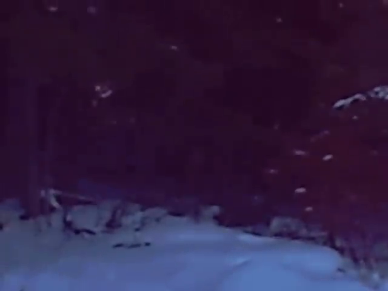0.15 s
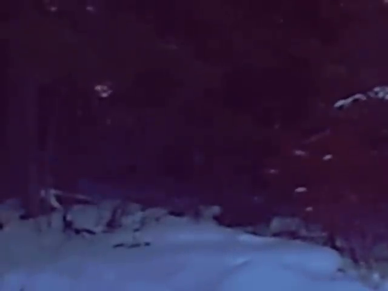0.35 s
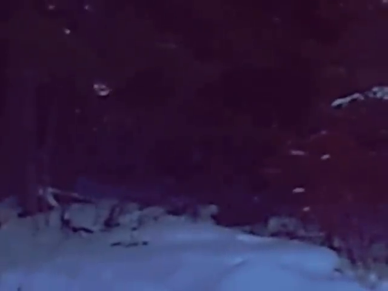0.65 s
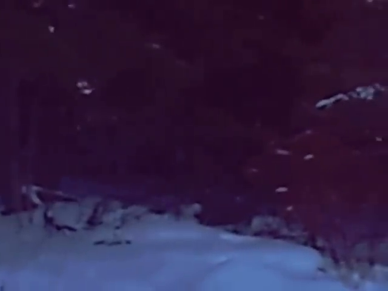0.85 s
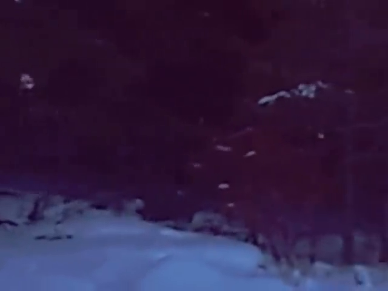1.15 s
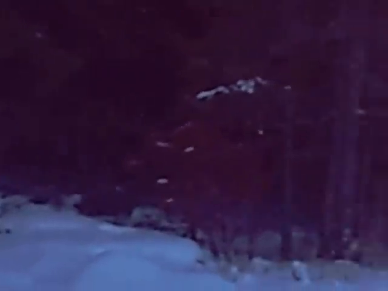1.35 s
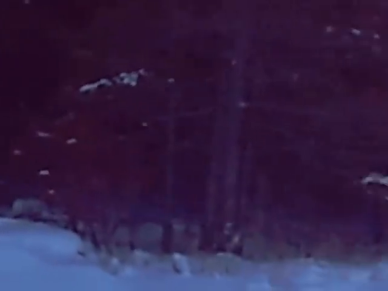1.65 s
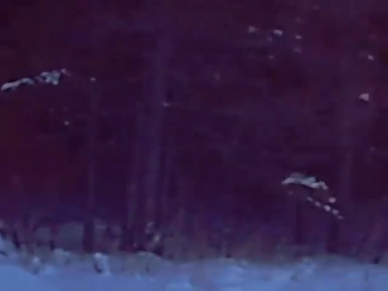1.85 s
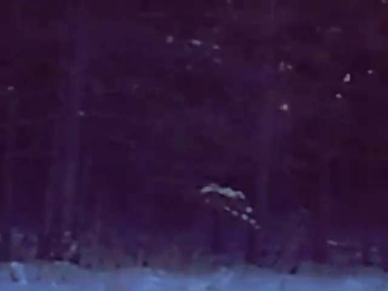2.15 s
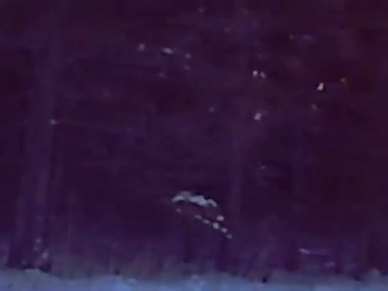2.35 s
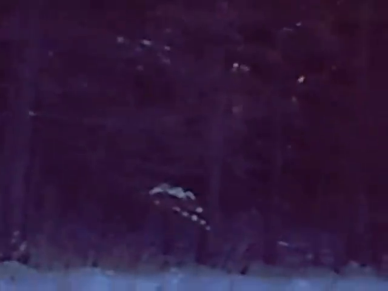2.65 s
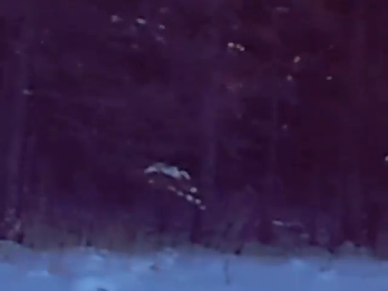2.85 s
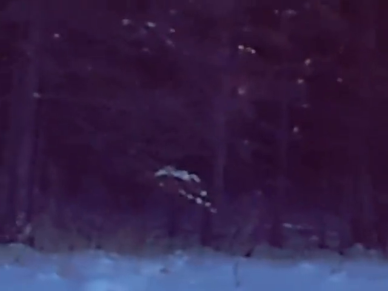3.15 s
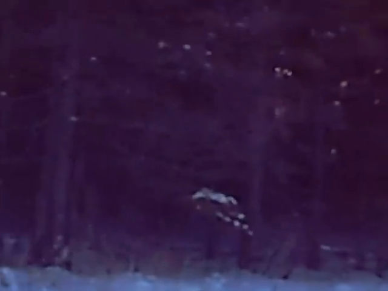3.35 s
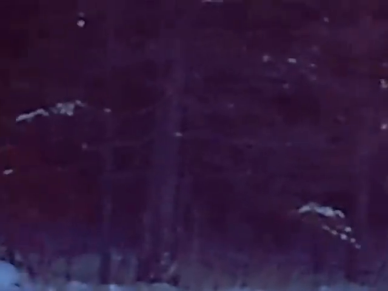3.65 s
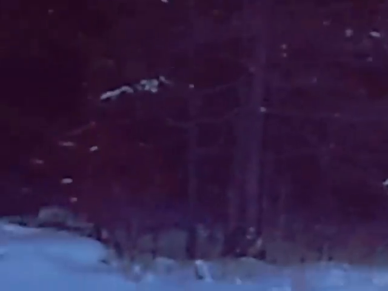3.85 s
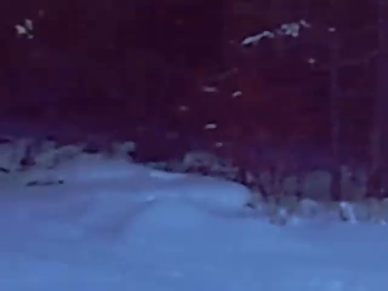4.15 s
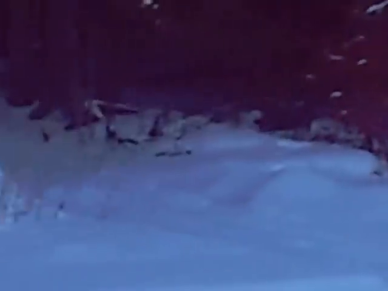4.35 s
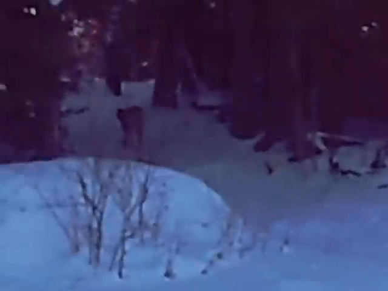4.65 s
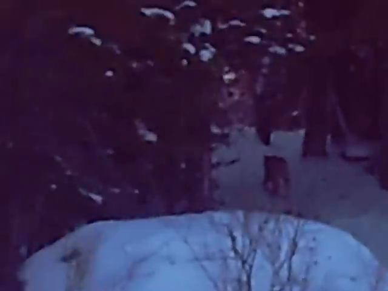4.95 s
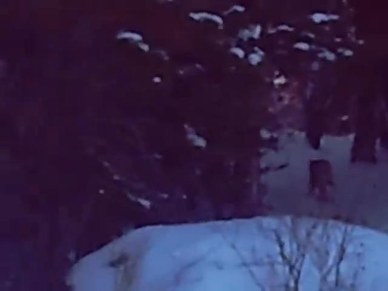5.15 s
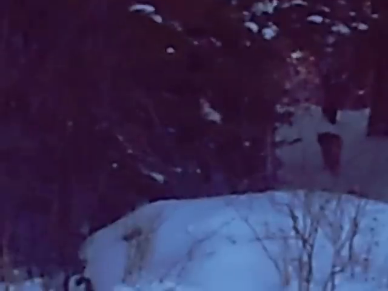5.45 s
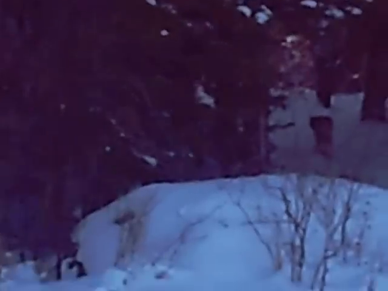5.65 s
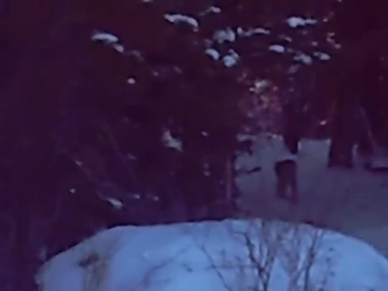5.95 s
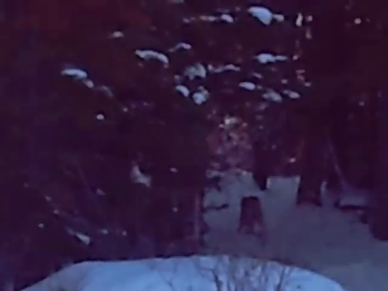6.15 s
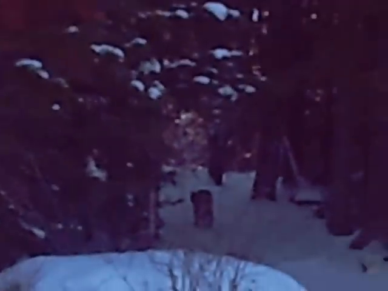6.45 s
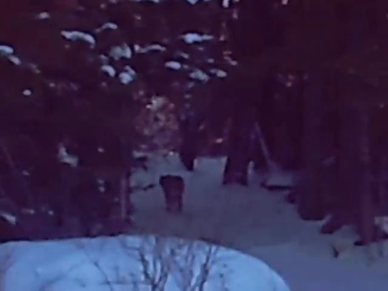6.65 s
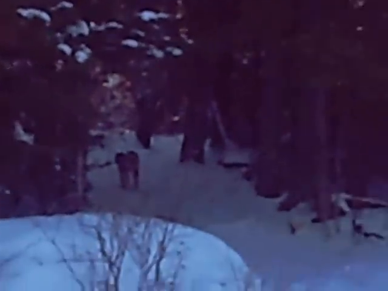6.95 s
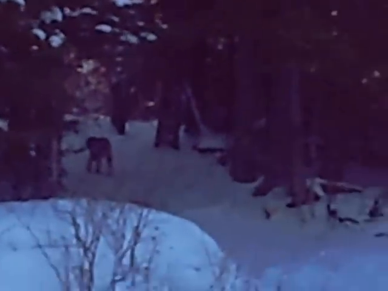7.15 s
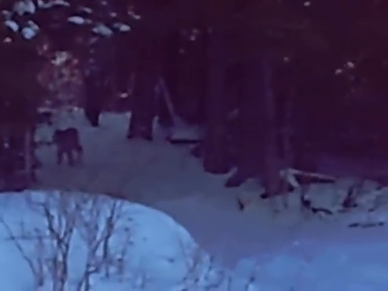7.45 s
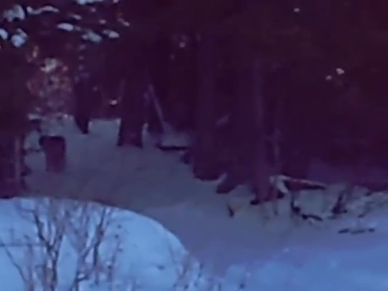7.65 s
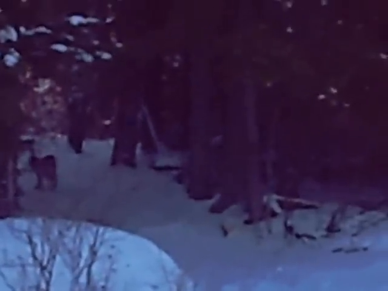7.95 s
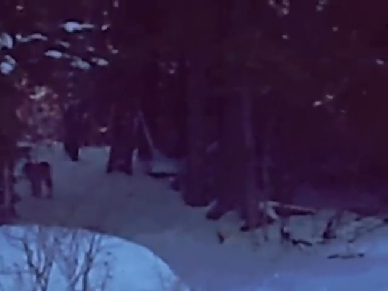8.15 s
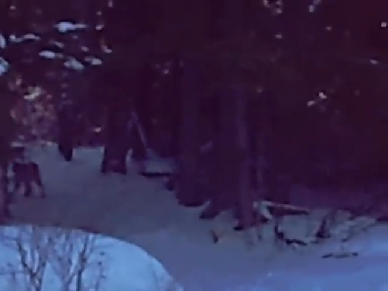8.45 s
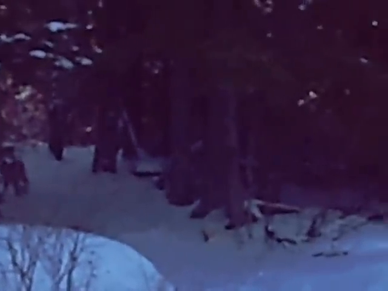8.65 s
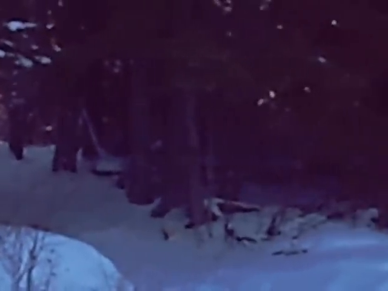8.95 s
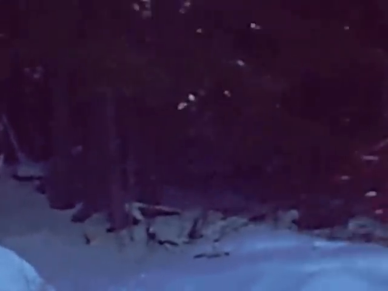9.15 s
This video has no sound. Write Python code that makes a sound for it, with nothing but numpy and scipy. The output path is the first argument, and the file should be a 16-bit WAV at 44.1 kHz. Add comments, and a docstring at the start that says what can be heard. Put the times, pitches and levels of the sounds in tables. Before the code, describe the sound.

A snowmobile idles close by with a deep, slightly uneven throb and faint rattling, while light wind bumps the microphone.

```python
"""In a snowy forest, a two-cylinder two-stroke snowmobile idles close to a hand-held microphone.
Each firing sends a puff down the exhaust, whose throb weakens every three or four firings as the
engine runs short of fuel. Pistons tick, the clutch clacks, panels and loose parts rattle and a fan
whines thinly. Around four seconds in, the microphone swings to another side of the machine
(the "turn"), which shifts the balance of the parts. Light wind rumbles and bumps on the microphone."""
import sys
import numpy as np
from scipy import signal
from scipy.fft import rfft, irfft, next_fast_len
from scipy.io import wavfile
from scipy.ndimage import uniform_filter1d, map_coordinates

SR = 44100
rng = np.random.default_rng(int(sys.argv[2]) if len(sys.argv) > 2 else 0)


def int16_out(signal):
    """Quantize to a 16-bit WAV file."""
    q = np.round(np.clip(np.atleast_2d(signal).T, -1, 1) * 32767)
    wavfile.write(sys.argv[1], SR, q.astype(np.int16))


N = 411005

IDLE_HZ = 58.15  # firings per second
# exhaust and chassis sink a little after the swing, then come back: t/s, gain/dB
NEARNESS = [(0, -1), (3.6, -1), (4.6, -1), (5.8, -2.5), (7.8, 0.5), (9.32, 1)]
# tone of rattling metal: f/Hz, gain before the turn/dB, gain after it/dB
RATTLE_TONE = [(990, -24, -13.5), (2140, -7, -3), (3530, -4, -0.5), (4760, -3.5, 0), (5230, -3, -5),
               (5970, -3, -4), (7070, -7, -5), (8200, -16, -15.5), (9800, -17.5, -14.5),
               (10500, -38, -37.5)]


def amp(db):
    """Turn decibels into a gain."""
    return 10 ** (np.asarray(db) / 20)


def unit(x):
    """Scale x to an average (rms) level of 1."""
    return x / np.sqrt(np.mean(x ** 2) + 1e-20)


def curve(points):
    """Join (time, value) points with straight lines, one value per sample."""
    return np.interp(np.arange(N) / SR, *np.transpose(points))


def wobble(rate):
    """A smooth curve through `rate` random values a second."""
    values = rng.standard_normal(int(N * rate / SR) + 4)
    return map_coordinates(values, [np.arange(N) * rate / SR])


def filtered(x, response):
    """Multiply each frequency in x by response(frequency)."""
    size = 2 * next_fast_len(N // 2 + SR // 4)
    return irfft(rfft(x, size) * response(np.fft.rfftfreq(size, 1 / SR)), size)[:N]


def coloured(x, points):
    """Shape the tone of x along (frequency, gain) points."""
    def response(hz):
        f, db = np.transpose(points)
        gain = amp(np.interp(np.log(hz + 1), np.log(f), db))
        cepstrum = irfft(np.log(gain))
        # folding this in half makes the filter ring after a hit, never before it
        cepstrum[1:len(hz) - 1] *= 2
        cepstrum[len(hz):] = 0
        return np.exp(rfft(cepstrum))
    return filtered(x, response)


def ringing(x, modes):
    """Let x ring at each (frequency, width, gain), with every second ring flipped in sign."""
    return filtered(x, lambda f: sum((-1) ** k * amp(db) * 1j * f * w / (c * c - f * f + 1j * f * w)
                                     for k, (c, w, db) in enumerate(modes)))


def strikes(phase, size, scatter_db):
    """One click, its size scattered at random, each time the phase passes a whole number."""
    at = np.flatnonzero(np.diff(np.floor(np.maximum.accumulate(phase))))
    train = np.zeros(N)
    train[at] = size[at] * amp(scatter_db * rng.standard_normal(N // 100)[:len(at)])
    return train


def dying(train, t60):
    """Give each click a tail that fades by 60 dB in t60 seconds."""
    return signal.lfilter([1], [1, -amp(-60 / (t60 * SR))], train)


def sooner(x, seconds):
    """Move x earlier in time."""
    return np.roll(x, -int(seconds * SR))


def turn_gain(levels_db, turn):
    """A gain that slides from the first level to the second during the turn."""
    before, after = levels_db
    return amp(before + (after - before) * turn)


def turn_filter(body, x, table, turn):
    """Filter x through a body, fading from the table's "before" gains to its "after" gains."""
    before = unit(body(x, np.delete(table, -1, axis=1)))
    after = unit(body(x, np.delete(table, -2, axis=1)))
    return unit((1 - turn) * before + turn * after)


def wind(breeze_db=-41, swing_db=1.5):
    """Air flowing over the microphone makes a low rumble that swells with each gust."""
    # gusts: t/s, half length/s, level/dB
    gusts = [(0.703, 0.55, -46), (2.2, 0.38, -33.5), (2.693, 0.14, -33.5), (3.277, 0.07, -30.5),
             (3.648, 0.098, -32), (4.299, 0.17, -32.5), (4.548, 0.16, -38), (5.158, 0.13, -30),
             (5.543, 0.18, -33), (6.294, 0.23, -34)]
    # tone of the rumble: f/Hz, gain/dB
    rumble_tone = [(4, -11), (12, -5), (35, -8), (70, -12.5), (130, -23), (300, -31), (1000, -68),
                   (3000, -100)]
    t = np.arange(N) / SR
    breeze = amp(breeze_db + swing_db * wobble(1.4))
    power = breeze ** 2 + sum(amp(db) ** 2 * np.exp(-((t - s) / half) ** 2) for s, half, db in gusts)
    return np.sqrt(power) * unit(coloured(rng.standard_normal(N), rumble_tone))


def wind_bumps(rise_s=0.0058, t60=0.067):
    """Short pushes of air hit the microphone, blunt or crisp, most with a fluttering tail."""
    # pushes: t/s, thump peak/dB, knock peak/dB, amount of flutter
    pushes = [(2.739, -27.5, -63, 0.11), (3.27, -40, -42, 0.04), (3.3, -25.5, -45, 0.03),
              (3.581, -27, -52, 0), (3.661, -32.5, -44, 0.05), (3.696, -22, -41, 0.03),
              (4.542, -27.5, -32, 0), (5.091, -27.5, -43, 0.1), (5.145, -27.5, -42, 0.02),
              (5.194, -39, -35.5, 0.05), (5.219, -32, -47, 0.08), (5.465, -21.5, -38, 0.03),
              (6.24, -27.5, -51, 0), (6.317, -27, -47, 0.1), (6.348, -26.5, -48, 0.03)]
    # tone of the blunt thump: f/Hz, gain/dB
    thump_tone = [(15, -24.5), (50, 6), (140, 0), (300, -8), (600, -27), (1500, -54), (4000, -59.5)]
    # tone of the crisp knock: f/Hz, gain/dB
    knock_tone = [(60, -7.5), (250, 8.5), (550, 4), (850, -14), (1300, -13.5), (4000, -48)]
    t = np.arange(SR // 8) / SR
    tail = (1 - np.exp(-t / rise_s)) * amp(-60 * t / t60)
    thumps, knocks = np.zeros((2, N + SR))
    for s, thump_db, knock_db, flutter in pushes:
        push = (t == 0) + flutter * tail * rng.standard_normal(len(t))
        thumps[round(s * SR):][:len(t)] += amp(thump_db) * push
        knocks[round(s * SR):][:len(t)] += amp(knock_db) * push
    return sum(coloured(x[:N], tone) / coloured([1], tone).max()
               for x, tone in [(thumps, thump_tone), (knocks, knock_tone)])


def fan(crank, burn, multiple=30):
    """The cooling fan whines at a multiple of the firing rate and flutters with the uneven shaft."""
    # loudness of the whine: t/s, level/dB
    whine_level = [(1.8, -75), (2.35, -66), (4, -72.5), (4.65, -66.5), (5.4, -71), (7.2, -69.5),
                   (7.7, -64.5), (8.7, -67), (9.32, -69)]
    flutter = sooner(burn, 0.005) ** 1.4 * amp(1.9 * wobble(18)) * (1 + 0.34 * wobble(80))
    slip = 0.15 * wobble(55)
    whine = np.sin(2 * np.pi * (multiple * crank + slip))
    return amp(curve(whine_level)) * unit(flutter * whine)


def loose_metal(burn, t60=0.1, rise_s=0.004):
    """A loose metal part chirps on the hardest firings and now and then clinks louder."""
    # loudness of the chirps: t/s, level/dB
    chirp_level = [(3.8, -77), (4.5, -79.5), (7.2, -75.5), (9.32, -70.5)]
    # single clinks: t/s, level/dB
    clink_hits = [(4.484, -61), (6.582, -60), (7.95, -60), (8.125, -60), (8.595, -59.5), (8.91, -60),
                  (8.98, -59.5), (9.115, -61)]
    # how the part rings: f/Hz, width/Hz, gain/dB
    metal_rings = [(4420, 94, -8.5), (4600, 97, -3)]
    t = np.arange(SR // 4) / SR
    clinks = np.zeros(N + SR)
    for s, db in clink_hits:
        clinks[round(s * SR):][:len(t)] += amp(db - 60 * t / t60) * (1 - np.exp(-t / rise_s))
    rubbing = unit(sooner(burn, 0.003) ** 2.3 * amp(2.2 * wobble(22)))
    ring = unit(ringing(rng.standard_normal(N), metal_rings))
    return (amp(curve(chirp_level)) * rubbing + clinks[:N]) * ring


def clutch(crank, burn, turn):
    """Three clutch weights each give one short, dry clack per revolution, a few much harder."""
    # loudness of the clacks: t/s, level/dB
    clack_level = [(0, -69), (1.3, -70.5), (1.85, -65.5), (2.6, -69.5), (5.3, -77.5), (9.32, -76)]
    blows = strikes(crank * 3 / 2 - 0.17 + 0.04 * wobble(90), burn ** 1.2, scatter_db=4)
    clacks = dying(blows, t60=0.007) * rng.standard_normal(N)
    return amp(curve(clack_level)) * turn_filter(coloured, clacks, RATTLE_TONE, turn)


def rattle(burn, turn):
    """Loose parts chatter, louder when the engine fires harder."""
    # loudness of the chatter: t/s, level/dB
    rattle_level = [(0, -62), (1.2, -62.5), (1.9, -61), (3, -62.5), (5.3, -63), (6.6, -62), (9.32, -59.5)]
    flicker = amp(2.26 * wobble(480) + 0.23 * wobble(25))
    chatter = unit((0.33 + sooner(burn, 0.0019)) * flicker) * rng.standard_normal(N)
    return amp(curve(rattle_level)) * turn_filter(coloured, chatter, RATTLE_TONE, turn)


def hood_and_cylinder(jolts, roughness=0.4):
    """The jolted hood drones at three pitches; a faint, high cylinder ring swells near two seconds."""
    # three hood rings, then the cylinder ring: f/Hz, width/Hz, gain added to its level below/dB
    rings = [(527, 14, -3.5), (680, 17, 0.5), (1060, 38, -5.5), (2290, 350, -3.5)]
    # loudness of each ring as the microphone moves: t/s, level/dB
    hood_low = [(0, -59), (1.4, -66), (2.1, -56.5), (3.4, -60.5), (4.6, -63.5), (7, -66), (9.32, -65.5)]
    hood_mid = [(0, -58.5), (2.05, -58), (2.5, -63), (3.4, -57.5), (4.6, -67.5), (8, -67), (9.32, -60.5)]
    hood_high = [(0, -59), (1.2, -61), (1.9, -55.5), (2.8, -68.5), (5.4, -79), (7.5, -64.5), (9.32, -63)]
    cylinder = [(1.2, -73), (1.8, -70.5), (2.2, -66.5), (2.8, -74)]
    shake = jolts + roughness * rng.standard_normal(N)
    return sum(amp(curve(level) + db) * unit(ringing(shake, [(hz, width, 0)]))
               for (hz, width, db), level in zip(rings, [hood_low, hood_mid, hood_high, cylinder]))


def chassis(crank, burn, turn, levels_db=(-53.5, -55.5), ring_db=-7, noise_db=-0.45):
    """Each firing shakes the panels, hood and cylinder; the frame knocks once per revolution."""
    # how the weaker panels ring: f/Hz, width/Hz, gain before the turn/dB, gain after it/dB
    panel_rings = [(581, 33, 5.5, 5.5), (818.4, 26, 5.5, 9.5), (1233, 17, -18.5, 1.5)]
    # tone of the frame's noise: f/Hz, gain before the turn/dB, gain after it/dB
    frame_tone = [(243, -10.5, -19.5), (506, 4.5, 0.5), (640, -3.5, -5.5), (750, -7.5, -10.5),
                  (940, -0.5, -4), (1330, -6, -5.5), (1528, -4.5, -6), (2050, -15.5, -17.5),
                  (2700, -14.5, -12.5), (6200, -47.5, -44)]
    bang = sooner(burn, 0.0055)
    jolts = unit(strikes(crank + 0.02 * wobble(60), bang ** 0.5, scatter_db=0.5))
    shake = jolts + 0.81 * bang ** 0.5 * rng.standard_normal(N)
    panels = turn_filter(ringing, shake, panel_rings, turn)
    drone = hood_and_cylinder(jolts)
    knocks = strikes(crank / 2 - 0.78, burn ** 0.71, scatter_db=1.5)
    noise_swell = 0.23 * unit(dying(knocks, t60=0.089)) + bang ** 0.4
    frame = turn_filter(coloured, noise_swell * rng.standard_normal(N), frame_tone, turn)
    gain = amp(curve(NEARNESS)) * turn_gain(levels_db, turn)
    return drone + gain * (amp(ring_db) * panels + amp(noise_db) * frame)


def pistons(crank, burn, turn, scraping=0.3, scrape_delay_s=0.002):
    """The two pistons slap their cylinder walls one after the other, once per revolution each."""
    # loudness of the ticks, which are easily blocked from view: t/s, level/dB
    tick_level = [(0, -58.5), (1.35, -60), (1.8, -56), (3.25, -63.5), (3.85, -58), (4.05, -73.5),
                  (6, -63.5), (7.6, -62), (9.32, -58.5)]
    # the far piston comes into the open after the turn: t/s, level against the near one/dB
    far_level = [(1.2, -8), (1.8, -6.5), (2.6, -10.5), (4.6, -11.5), (6, 0.4)]
    # how the cylinders ring: f/Hz, width/Hz, gain before the turn/dB, gain after it/dB
    cylinder_rings = [(2154, 120, -7.5, -3.5), (2390, 130, -1, -1), (2596, 110, -9.5, -3),
                      (2960, 84, -0.5, 1), (4160, 61, -8, -4.5), (4540, 88, -13, -8)]
    near = strikes(crank / 2 - 0.725 + 0.0015 * wobble(30), burn ** 0.15, scatter_db=1)
    far_size = amp(curve(far_level)) * burn ** 0.18
    far = strikes(crank / 2 - 0.19 + 0.0018 * wobble(30), far_size, scatter_db=0.7)
    slaps = near + far
    # the piston's side lands hard, then scrapes on
    scrape = dying(np.roll(slaps, int(scrape_delay_s * SR)), t60=0.012) * rng.standard_normal(N)
    contact = unit(slaps) + scraping * unit(scrape)
    return amp(curve(tick_level)) * turn_filter(ringing, contact, cylinder_rings, turn)


def combustion(swing=0.36, swing_firings=3.4, spread_s=0.004, gap_s=0.011, rebound_s=0.033):
    """How hard the fuel burns: it swings between rich and lean, and each misfire leaves a hole."""
    # lean moments when the engine misfires: t/s, relative depth (0-1)
    misfires = [(0.109, 0.8), (0.299, 0.8), (0.451, 0.6), (0.59, 0.7), (0.641, 1), (0.692, 0.9),
                (0.794, 0.8), (0.846, 1), (1.145, 0.5), (1.219, 0.6), (1.357, 0.9), (1.427, 0.5),
                (1.483, 0.8), (1.685, 0.5), (1.792, 1), (1.968, 0.4), (2.078, 0.5), (2.168, 0.8),
                (2.347, 0.8), (2.499, 0.3), (2.893, 0.7), (3.245, 0.7), (3.843, 0.6), (4.113, 0.7),
                (4.307, 0.8), (4.431, 0.6), (4.533, 0.7), (4.583, 0.6), (4.635, 0.8), (4.683, 0.3),
                (4.732, 0.9), (4.788, 0.8), (4.841, 0.6), (4.959, 0.5), (5.011, 0.8), (5.132, 0.7),
                (5.394, 0.8), (5.588, 0.8), (5.837, 0.6), (5.886, 0.9), (5.948, 0.9), (6.065, 0.6),
                (6.221, 0.5), (6.286, 0.7), (6.341, 0.8), (6.703, 0.6), (6.834, 0.6), (7.087, 0.6),
                (7.227, 1), (7.566, 0.5), (7.806, 0.9), (7.94, 0.5), (8.005, 0.5), (8.176, 0.7),
                (8.225, 0.6), (8.275, 0.4), (8.431, 0.5), (8.479, 0.8), (8.537, 0.6), (8.583, 0.8),
                (8.824, 0.9), (9.094, 0.9), (9.17, 0.5), (9.243, 0.5)]
    at, size = np.transpose(misfires)
    edges = np.r_[0, at, N / SR]
    # a whole number of swings lies between two misfires
    swings = np.maximum(1, np.round(np.diff(edges) * IDLE_HZ / swing_firings))
    uneven_time = np.arange(N) / SR + spread_s * wobble(10)
    cycle = np.interp(uneven_time, edges, np.r_[0, np.cumsum(swings)])
    t = np.arange(-SR // 8, SR // 8 + 1) / SR
    dip = 0.8 * np.exp(-0.5 * (t / gap_s) ** 2)
    rebound = 0.08 * np.exp(-0.5 * ((abs(t) - rebound_s) / gap_s) ** 2)  # harder bangs on both sides
    misses = np.bincount((at * SR).astype(int), size, minlength=N)[:N]
    holes = signal.fftconvolve(misses, rebound - dip, "same")
    unrest = 0.09 * wobble(60)
    burn = np.abs((1 + holes) * (1 - swing * np.cos(2 * np.pi * cycle) + unrest))
    burn = burn / uniform_filter1d(burn, SR // 7)  # the fuel supply is steady over several firings
    return unit(burn / (1 + (burn / 2.13) ** 4) ** (1 / 4))  # levels off at a full charge of fuel


def exhaust(crank, burn, turn, boom_db=(-27.5, -29), hum_db=(-41.5, -44), ring_db=-7):
    """A deep boom at the firing rate, its overtones, and uneven puffs through muffler and pipe."""
    # clean overtones: multiple of the firing rate, gain before the turn/dB, gain after it/dB
    overtones = [(2, -4, -0.5), (3, -5.5, -10.5), (4, 1.5, -6), (5, -3, -2.5)]
    # how the pipe rings: f/Hz, width/Hz, gain before the turn/dB, gain after it/dB
    pipe_rings = [(210.4, 6.1, 4, 4.5), (298.7, 15, -6.5, -11.5), (362.3, 8.1, -1.5, -9)]
    # tone of a puff leaving the muffler: f/Hz, gain/dB
    muffler_tone = [(15, -27), (40, 0), (76, -0.5), (88, -2.5), (99, 5.5), (130, 1.5), (170, -21.5),
                    (260, -26), (330, -12), (420, -23.5), (1200, -43.5), (3000, -80.5)]
    # a side chamber of the muffler swallows one band: f/Hz, width/Hz, cancelling wave/dB
    side_chamber = [(245, 22.3, -6.5)]

    def flow(lead_s):
        """The gas flow follows the burn, lead_s seconds early, and drops in each misfire."""
        return unit(0.13 + sooner(burn, lead_s) ** 1.14)

    # a hard bang hurries the next stroke, a misfire delays it
    hurry = 3 * dying(burn - burn.mean(), t60=0.27) / SR
    boom = unit(burn * np.cos(2 * np.pi * (crank - 0.27 + hurry)))
    # the lowest overtones swell and fade first
    tones = sum(turn_gain(db, turn) * flow(0.031 / k) * np.sin(2 * np.pi * k * crank)
                for k, *db in overtones)
    # the unevenness of the puffs fills in the sound between the overtones
    puff_phase = crank + 0.16 + 0.012 * wobble(60)
    unevenness = burn.mean() - burn + 0.025 * wobble(58)
    puffs = strikes(puff_phase, unevenness, scatter_db=0)
    pipe = amp(ring_db) * turn_filter(ringing, puffs, pipe_rings, turn)
    muffler = unit(coloured(puffs, muffler_tone))
    hum = tones + np.sqrt(flow(0.012)) * pipe + muffler
    hum = hum - ringing(hum, side_chamber)
    return amp(curve(NEARNESS)) * (turn_gain(boom_db, turn) * boom + turn_gain(hum_db, turn) * hum)


def scene():
    """One crankshaft drives every part of the engine; the wind is added on top."""
    turn = curve([(3.47, 0), (5, 1)])  # 0 before the microphone swings round, 1 after
    firing_hz = IDLE_HZ + 0.15 * wobble(3)
    shaft_jitter = 0.0095 * wobble(18)
    crank = np.cumsum(firing_hz) / SR + shaft_jitter  # counts firings, two per revolution
    burn = combustion()
    engine = (exhaust(crank, burn, turn) + chassis(crank, burn, turn) + rattle(burn, turn)
              + pistons(crank, burn, turn) + clutch(crank, burn, turn)
              + loose_metal(burn) + fan(crank, burn))
    return (engine + wind() + wind_bumps())[None]


def record(dry):
    """The microphone's treble fades, then cuts off completely."""
    fade_hz, top_hz = 8700, 9740
    return filtered(dry[0], lambda hz: (hz < top_hz) / np.sqrt(1 + (hz / fade_hz) ** 34))[None]


dry = scene()
out = record(dry)
int16_out(out)
```